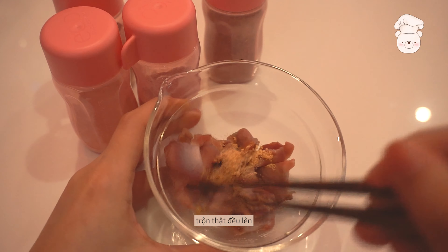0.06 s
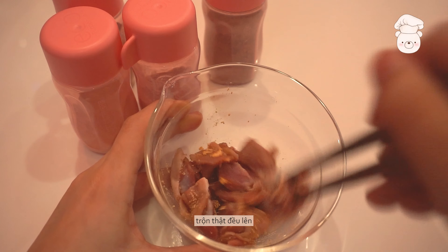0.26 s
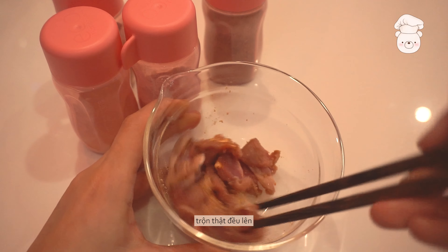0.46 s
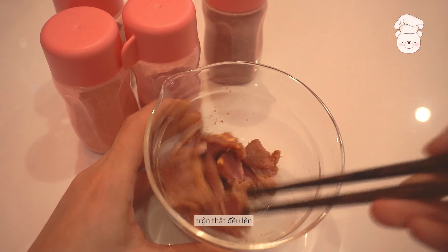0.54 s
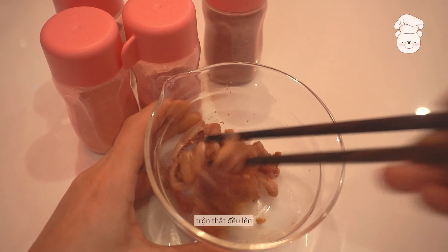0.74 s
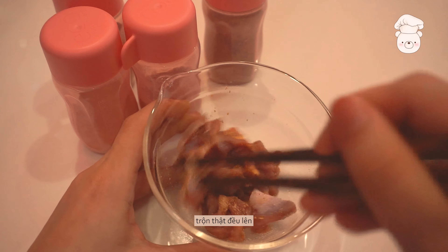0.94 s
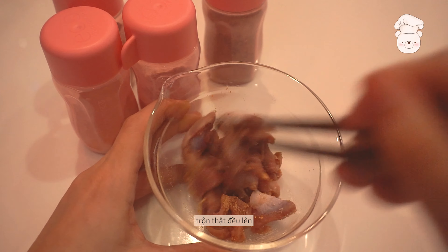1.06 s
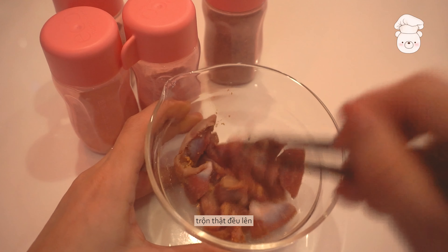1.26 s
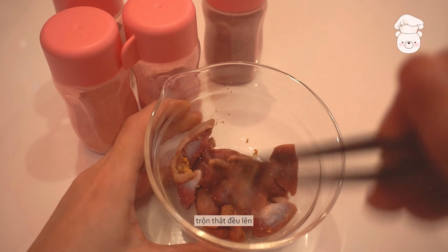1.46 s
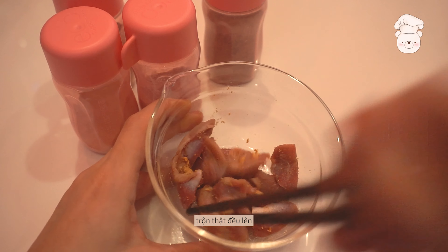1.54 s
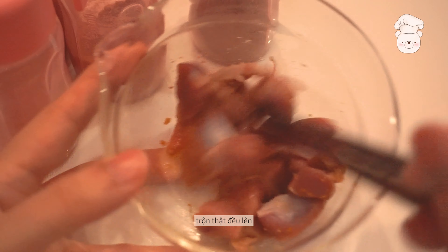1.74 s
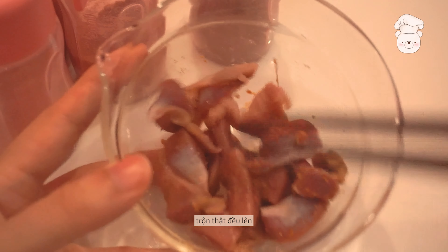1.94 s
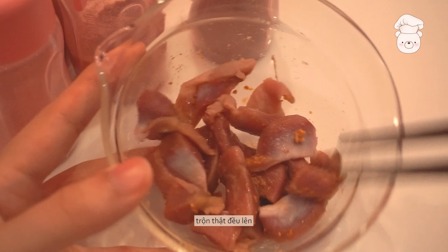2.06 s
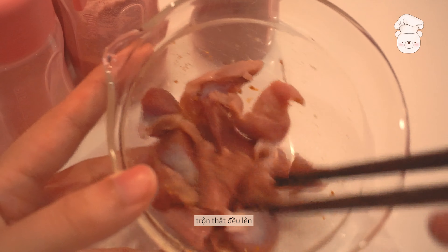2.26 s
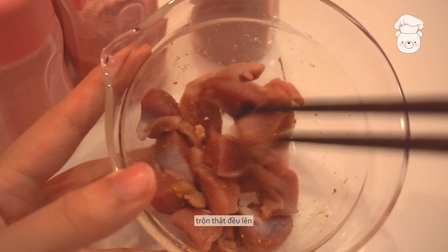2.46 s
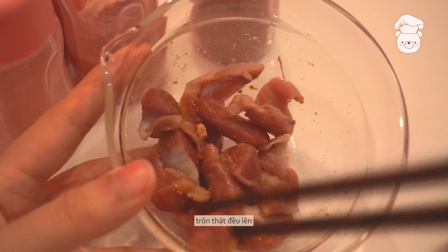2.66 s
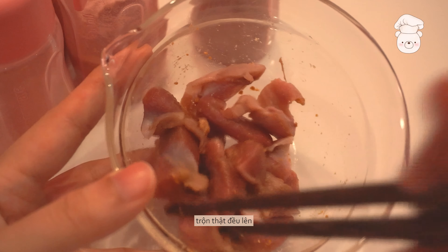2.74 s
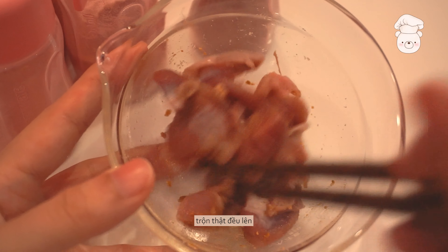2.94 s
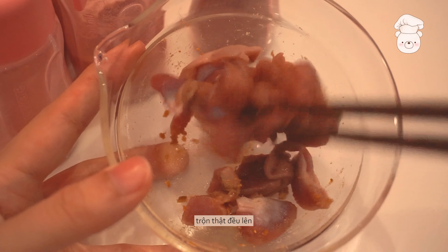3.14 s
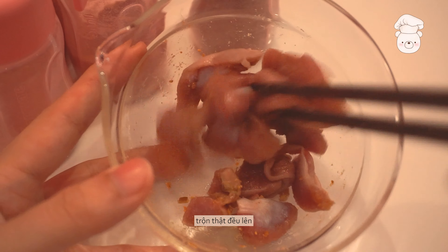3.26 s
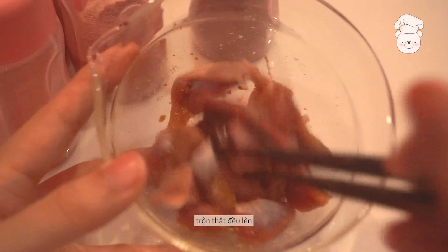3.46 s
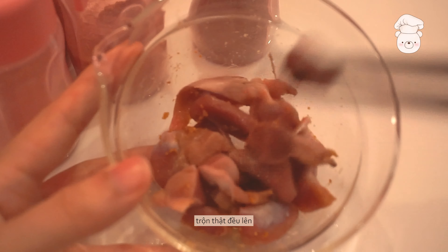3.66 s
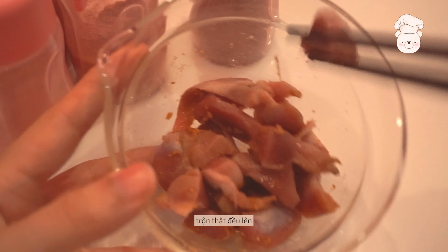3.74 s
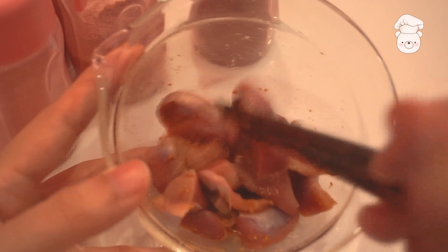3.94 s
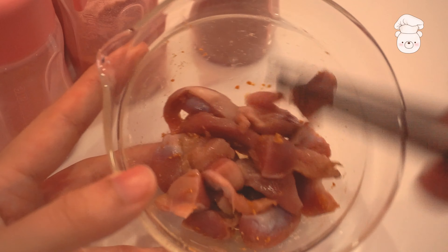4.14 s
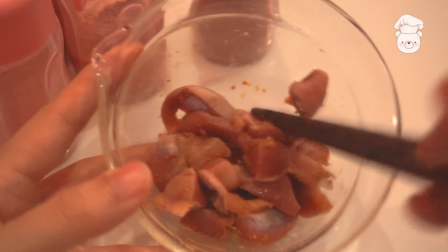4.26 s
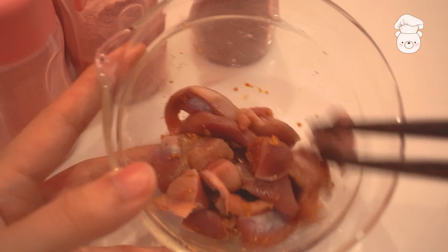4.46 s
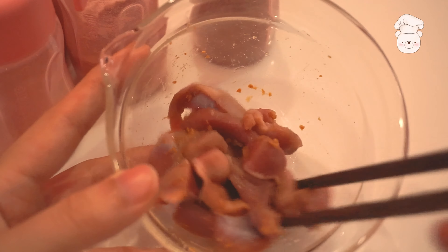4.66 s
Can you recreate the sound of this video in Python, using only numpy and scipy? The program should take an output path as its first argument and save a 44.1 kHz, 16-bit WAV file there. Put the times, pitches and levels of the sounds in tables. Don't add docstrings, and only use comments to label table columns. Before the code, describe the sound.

Wooden chopsticks stir wet meat in a glass bowl, with squelchy ticks, light glass taps and one hard clack over faint fridge hum and hiss.

```python
import sys
import numpy as np
from scipy import signal
from scipy.fft import rfft, irfft
from scipy.io import wavfile
from scipy.ndimage import uniform_filter1d

SR = 44100
rng = np.random.default_rng(int(sys.argv[2]) if len(sys.argv) > 2 else 0)


def level_to_linear(level):
    exponent = np.asarray(level, float) / 20
    return 10 ** exponent


def generate_wav(signal):
    frames = np.transpose(np.atleast_2d(signal))
    scaled = np.clip(frames, -1, 1) * 32767
    pcm = np.round(scaled).astype(np.int16)
    wavfile.write(sys.argv[1], SR, pcm)


N = 313582
TIME_S = np.arange(N) / SR

# (frequency [Hz], density [dB per Hz])
AIR_SPECTRUM = [(18, -61), (30, -24.5), (117, -20), (166, -8.5), (230, -2.5), (266, -7.5), (302, 0),
                (737, -2.5), (1210, -4.5), (1480, -8), (1940, -10), (4740, -16), (9270, -17.5), (9980, -16),
                (11300, -14), (14700, -57.5), (22000, -120)]
AIR_DB = -64.5
# (frequency [Hz], correlation [-1..1])
AIR_LIKENESS = [(60, 0.66), (130, 0.8), (270, 0.71), (580, 0.39), (1220, -0.082), (2600, -0.27),
                (5520, -0.023), (11700, -0.093)]

# (time [s], speed [Hz])
SHAFT_SPEED = [
    (0, 57.3),
    (5.5, 57.4),
    (6.3, 57.8),
    (7.11, 58.8),
]
CARRIER_HZ, BUZZ_DB = 10052.2, -77.5
# (order, left [dB], right [dB], left phase lead [rad])
WHINE_SIDEBANDS = [(-9, -87, -99, -.6), (-8, -89, -99, -.6), (-6, -88, -88, -1.2), (-5, -89, -95, -1.8),
                   (-4, -77, -85, -2.3), (-3, -82, -85, -.5), (-2, -73, -88, 2.3), (-1, -74, -81, -1.7),
                   (0, -81, -93, -.7), (1, -74, -79, -2.3), (2, -75, -95, -1.1), (3, -88, -89, -.9),
                   (4, -76, -74, -1), (6, -83, -88, 3.1), (8, -81, -94, -2.5)]
HUM_LINES_HZ = (299.5, 1194.3)
# (left [dB], right [dB])
HUM_LINES_DB = [(-78.5, -82.5), (-68.5, -86.5)]

# (frequency [Hz], t60 [s])
ROOM_DECAY = [(500, 0.33), (1500, 0.37), (3000, 0.27), (6000, 0.2), (10000, 0.11)]
ROOM_DB, ROOM_GAP_S = -6.5, 0.012
ECHO_HOLD_S = 0.3

# (time [s], level [dB], pitch [Hz], length [s])
HAND_BUMPS = [
    (.36, -76, 170, .16),
    (1.7, -88, 38, .14),
    (4.12, -90, 55, .1),
    (6.29, -88, 33, .09),
]
# (start [s], level [dB], length [s])
DRAGS = [
    (0, -78, 0.6),
    (.55, -81, 0.46),
    (2.76, -73, .09),
    (3.38, -79, .12),
    (3.8, -77, .07),
    (5.15, -82, 0.26),
    (5.9, -80, .12),
]
# (time [s], level [dB], pitch [Hz], length [s])
TIP_SQUEAKS = [
    (1.418, -65, 6400, .02),
    (1.716, -68, 6450, 0.013),
    (1.758, -68, 6400, .016),
    (1.842, -65, 6340, .012),
    (3.245, -62.5, 6350, .01),
    (4.86, -72, 6400, 0.039),
    (5.28, -74.5, 6350, .02),
    (6.165, -71, 8550, .025),
    (6.463, -72, 3600, .02),
]

# (time [s], level [dB], pitch [Hz], left minus right [dB])
WET_POPS = [(0.0575, -55, 5600, 5), (.1182, -43, 6900, 5), (.1362, -55, 6300, 1.5), (.1954, -57, 8330, 3.5),
            (.2012, -51, 7070, 2.5), (.2638, -54, 9250, 5), (.893, -53, 9070, 4), (1.2024, -45, 5500, 11),
            (1.4109, -50, 7260, 10), (1.846, -49, 8500, 5), (1.859, -48, 8700, 1.5), (1.871, -50, 8860, 6),
            (2.0954, -45, 4350, -16), (2.1795, -56, 7900, 1.5), (2.2797, -51, 9150, 5),
            (2.3915, -55, 9120, 1.5), (2.7614, -51, 9180, 6), (2.832, -46, 9250, 0),
            (2.9587, -40.5, 7210, 3), (2.9748, -41, 9190, 7.5), (2.9828, -53, 6600, 11),
            (4.1514, -57, 8800, 2.5), (3.966, -47, 9180, 1.5), (4.2043, -58, 6600, -3),
            (4.639, -63, 5300, -16), (4.739, -47, 4600, -14), (4.7845, -54, 4550, 6),
            (4.842, -47, 8540, 2.5), (5.0285, -53.5, 7200, 11), (5.0965, -50, 7860, 1.5)]
# (time [s], level [dB])
FILM_SNAPS = [(.1124, -61), (.1182, -54), (.1362, -56), (.1954, -53), (.2638, -52), (0.744, -51),
              (.9024, -58), (1.202, -45), (1.4109, -52), (1.4692, -52), (1.611, -56), (1.846, -48),
              (1.859, -46), (2.115, -54), (2.2797, -47), (2.9748, -46.5), (2.825, -60), (3.2086, -59),
              (3.966, -51), (4.2305, -55), (4.639, -55), (4.7394, -49), (4.7848, -50.5), (4.842, -49),
              (4.9197, -55), (5.1457, -54), (5.525, -48.5), (5.5459, -53), (6.3314, -54.5)]
SNAP_T60_S, SNAP_PAN_DB = 0.003, 4.5
# (peak time [s], level [dB], finest against larger bubbles [dB], swell [s], fade [s])
JUICE_SQUEEZES = [(.116, -58, -30, .016, 0.072), (.194, -77, 4, .012, .12), (.894, -74.5, 2, .016, .056),
                  (1.202, -55, -6.5, .012, 0.04), (1.25, -63, -14, .04, 0.2),
                  (1.408, -62.5, -8, .008, 0.098), (1.858, -70.5, 6, 0.077, .046),
                  (2.1, -62.5, -1, .016, 0.051), (2.265, -66, -2.5, .04, 0.17), (2.846, -69, -9, .045, .09),
                  (2.965, -56, -8, 0.019, 0.077), (3.97, -73, -1, .02, 0.07),
                  (4.736, -50.5, -12, 0.017, .07), (4.8, -65.5, -10, .06, 0.33),
                  (5.03, -74, -2.5, 0.028, .13), (5.524, -85, 17.5, .03, .075), (6.35, -86, 14, .055, .04)]

# (time [s], loaded lowest mode [Hz], its level [dB], even modes [dB], third mode [dB])
GLASS_BLOWS = [
    (1.203, 893, -56, -43.5, -47.5),
    (2.093, 878, -55.5, -66, -46.5),
    (2.757, 836, -73, -85, -68),
    (3.795, 832, -59.5, -62, -66),
    (4.741, 839, -46, -53, -53),
    (5.284, 900, -58, -72, -90),
    (5.321, 832, -56, -63, -66),
    (6.003, 870, -59.5, -74, -66.5),
    (6.044, 812, -59.5, -76, -67),
]
# (frequency [Hz], t60 [s], left minus right [dB], twin apart [Hz], towards walls [dB])
BOWL_MODES = [
    (855, 0.11, 3, -22, -0.5),
    (2123, 0.055, -2, 38, -2),
    (3870, 0.071, -6, 42, -8),
    (5953, 0.045, 7, 27, 4),
]
FOURTH_DB, HARD_DB, FOURTH_SLOPE = 2, -44, 0.8

# (time [s], low bends [dB], middle bends [dB], upper bends [dB], crack [dB])
STICK_BLOWS = [
    (1.6095, -66, -61.5, -63.5, -68),
    (1.6364, -75, -68, -73, -63),
    (2.7577, -53, -57, -67, -53),
    (3.4069, -64.5, -64.5, -77, -67),
    (4.205, -61.5, -64.5, -73, -66),
    (4.7388, -18.5, -19, -19.5, -30),
    (5.3206, -56, -46.5, -49.5, -58.5),
    (5.6301, -57.5, -48, -51, -58),
    (6.0051, -63, -55.5, -52, -60),
    (6.0443, -54.5, -47.5, -46, -60),
]
# (frequency [Hz], towards phone [dB], t60 [s], towards walls [dB])
STICK_BENDS = [
    [(1338, 2, .03, 1.1), (1114, -24.5, 0.0063, -1.5)],
    [(1565, 0.5, 0.016, 4), (1703, 4.5, .018, -1.5), (1837, 1.5, 0.016, -2.5)],
    [(2698, 3.5, 0.012, -2.5), (2868, 2.5, .008, 0.5)],
    [(3470, -5.5, 0.0044, 3), (3650, -5, .006, -1.5), (4310, 4.5, 0.0061, -4)],
]
# (time [s], level [dB], centre [Hz], t60
# [s], left minus right [dB])
TIP_HITS = [(.1362, -44.5, 3400, 0.0045, 1.5), (1.203, -29, 2830, 0.0067, 6),
            (1.2025, -33, 4500, 0.0067, .6), (1.2025, -35.5, 1330, .004, 7),
            (2.0948, -28.5, 3080, 0.0044, -12), (2.0945, -34, 4360, 0.0047, 3),
            (2.0965, -36, 1360, 0.0052, 6), (2.9585, -43, 4130, 0.0054, 1.5),
            (3.7951, -35.5, 2700, 0.005, 1.2), (3.7948, -31, 4300, 0.003, 9),
            (3.7935, -46, 1240, 0.011, 1.2), (4.739, -32, 1310, .006, -2), (4.73996, -24, 3250, .003, 1.5),
            (5.325, -52, 2600, .04, 1.5), (5.634, -56, 2700, .04, 1.5), (6.048, -54, 1560, .05, 1.5),
            (4.8, -44, 5200, .004, 1.5), (4.3, -51, 1050, 0.0073, 1.5)]
DIP_HZ, DIP_Q, TIP_WALL_DB = 2200, 3.5, -1.5

SMEAR_DB, SMEAR_S, TOP_HZ = -29, 0.015, 11020


def on_log_hz(hz, table):
    table_hz, value = np.transpose(table)
    return np.interp(np.log(hz + 1), np.log(table_hz), value)


def sides(pan_db):
    return level_to_linear(np.array([pan_db, -np.asarray(pan_db)]) / 2)


def walk(rate_hz):
    k = int(SR / rate_hz)
    steps = np.repeat(rng.standard_normal(N // k + 1), k)
    return 1.45 * uniform_filter1d(uniform_filter1d(steps, k), k)[:N]


def band(x, lo_hz, hi_hz):
    return signal.sosfilt(signal.butter(2, [lo_hz, hi_hz], "band", fs=SR, output="sos"), x)


def high_pass(x, hz):
    return signal.sosfilt(signal.butter(3, hz, "high", fs=SR, output="sos"), x)


def ring(start_s, db, pan_db, hz, t60_s, push_s):
    out = np.zeros((2, N + SR))
    events = np.broadcast_arrays(start_s, db, pan_db, hz, t60_s)
    for one_s, one_db, one_pan_db, one_hz, one_t60_s in zip(*events):
        t = np.arange(int(one_t60_s * SR) + 8) / SR
        rise = np.sin(np.pi / 2 * np.minimum(t / push_s, 1)) ** 2
        decay = level_to_linear(one_db - 60 * t / one_t60_s)
        tone = decay * rise * np.sin(2 * np.pi * one_hz * t)
        i = int(one_s * SR)
        out[:, i:i + len(t)] += sides(one_pan_db)[:, None] * tone
    return out[:, :N]


def slips(table, waver_hz, depth):
    out, waver = np.zeros(N), walk(waver_hz)
    for s, db, hz, length_s in table:
        i = int(s * SR) + np.arange(int(length_s * SR))
        phase = 2 * np.pi * np.cumsum(hz * (1 + depth * waver[i])) / SR
        out[i] += level_to_linear(db) * np.hanning(len(i)) * np.sin(phase)
    return out


def air():
    hz = np.arange(N // 2 + 1) * SR / N
    like = np.clip(on_log_hz(hz, AIR_LIKENESS), -1, 1)
    noise = rfft(rng.standard_normal((2, N))) * level_to_linear(on_log_hz(hz, AIR_SPECTRUM))
    mid, side = noise * np.sqrt([1 + like, 1 - like])
    rush = irfft([mid + side, mid - side], N)
    return rush / rush.std() * level_to_linear(AIR_DB + 0.5 * walk(0.89)) * sides(1.2)[:, None]


def fridge():
    shaft = 2 * np.pi * np.cumsum(np.interp(TIME_S, *np.transpose(SHAFT_SPEED))) / SR
    carrier = 2 * np.pi * CARRIER_HZ * TIME_S
    lines = [(carrier + order * shaft, db, lead) for order, *db, lead in WHINE_SIDEBANDS]
    lines += [(2 * np.pi * hz * TIME_S, db, 0) for hz, db in zip(HUM_LINES_HZ, HUM_LINES_DB)]
    buzz = band(rng.standard_normal((2, N)), 9750, 10350)
    out = level_to_linear(BUZZ_DB) * sides(4.5)[:, None] * buzz / buzz.std()
    for phase, db, lead in lines:
        start = 2 * np.pi * rng.random() + np.array([[lead], [0]])
        level = np.sqrt(2) * level_to_linear(np.array(db)[:, None] - 1.2 + 2.5 * walk(4))
        out = out + level * np.sin(phase + start + 0.4 * walk(5))
    return out


def kitchen(x):
    t, hold = np.arange(SR // 2) / SR, int(ECHO_HOLD_S * SR)
    places = np.pad(x.mean(axis=0), (0, -N % hold)).reshape(-1, 1, hold)
    noise = rng.standard_normal((4, 2, len(t)))
    tail = 0
    for hz in 250 * 2 ** np.arange(0, 6, 0.5):
        decay = np.exp(-np.log(1000) * t / on_log_hz(hz, ROOM_DECAY))
        tail = tail + band(noise, hz, hz * np.sqrt(2)) * decay
    tail = tail * np.clip(t / ROOM_GAP_S - 0.4, 0, 1)
    tail = tail / np.sqrt((tail ** 2).sum(axis=(1, 2), keepdims=True) / 2)
    out = np.zeros((2, N + SR))
    for k, part in enumerate(places):
        echo = signal.fftconvolve(part, tail[k % 4], axes=1)
        out[:, k * hold:(k + 1) * hold + len(t) - 1] += echo
    return level_to_linear(ROOM_DB) * out[:, :N]


def bumps():
    return slips(HAND_BUMPS, 29.8, 0.04)


def rubs():
    grains = rng.standard_normal((2, N)) * level_to_linear(3.0 * rng.exponential(size=N))
    drag = band(grains, 1250, 2500)
    stroke = 0
    for s, db, length_s in DRAGS:
        stroke = stroke + level_to_linear(db) * np.sin(np.pi * np.clip((TIME_S - s) / length_s, 0, 1))
    return stroke * level_to_linear(2.8 * walk(25)) * drag / drag.std()


def squeaks():
    return slips(TIP_SQUEAKS, 300, 0.012) * sides(2.2)[:, None]


def pops():
    s, db, hz, pan_db = np.transpose(WET_POPS)
    return ring(s + 0.0003, db + 11.0, pan_db, hz, 15 / hz, push_s=0.00037)


def snaps():
    s, db = np.transpose(FILM_SNAPS)
    hz = 10300 * (1 + 0.02 * rng.standard_normal(len(s)))
    ticks = ring(s + 0.0003, db + 14.5, SNAP_PAN_DB, hz, SNAP_T60_S, push_s=0.0005)
    return band(ticks, 9300, 12500)


def fizz():
    grains = rng.standard_normal((2, N)) * level_to_linear(3.3 * rng.exponential(size=N))
    fine_level, large_level = np.zeros(N), np.zeros(N)
    for s, db, fine_db, swell_s, fade_s in JUICE_SQUEEZES:
        squeeze = np.interp(TIME_S, [s - swell_s, s, s + fade_s], [0, 1, 0])
        fine_level += level_to_linear(db + fine_db) * squeeze
        large_level += level_to_linear(db) * squeeze
    fine, large = band(grains, 9500, 11200), band(grains, 5000, 9300)
    hiss = 2.1 * fine_level * fine / fine.std() + 0.5 * large_level * large / large.std()
    return sides(2.67)[:, None] * hiss


def bowl():
    s, low_hz, low_db, even_db, third_db = np.transpose(GLASS_BLOWS)
    fourth_db = even_db + FOURTH_DB + FOURTH_SLOPE * (even_db - HARD_DB)
    twin_db = -5 + 2.0 * rng.standard_normal((4, len(s)))
    out = 0
    for k, db in enumerate([low_db, even_db, third_db, fourth_db]):
        hz, t60_s, pan_db, apart_hz, wall_db = BOWL_MODES[k]
        hz = hz if k else low_hz
        pair = ring(s, db + 4.0, pan_db, hz, t60_s, push_s=0.0037)
        pair = pair + ring(s, db + twin_db[k], -pan_db, hz + apart_hz, t60_s, push_s=0.003)
        out = out + np.array([pair, level_to_linear(wall_db) * pair])
    return out


def sticks():
    s, *group_db = np.transpose(STICK_BLOWS)
    modes = [(db, *mode) for db, group in zip(group_db, STICK_BENDS) for mode in group]
    near = far = 0
    for db, hz, near_db, t60_s, far_db in modes:
        hz = hz * (1 + 0.004 * rng.standard_normal(len(s)))
        pan_db = 0.7 + 2.5 * rng.standard_normal(len(s))
        near = near + ring(s + 0.00033, db + near_db + 9.0, pan_db, hz, t60_s, push_s=0.0018)
        far = far + ring(s, db + far_db + 8.5, 0, hz, t60_s, push_s=0.0014)
    bends = signal.lfilter(*signal.iirnotch(DIP_HZ, DIP_Q, fs=SR), [near, far])
    tip_s, tip_db, tip_hz, tip_t60_s, tip_pan_db = np.transpose(TIP_HITS)
    tips = ring(tip_s, tip_db, tip_pan_db, tip_hz, tip_t60_s, push_s=0.00062)
    return high_pass(bends + [tips, level_to_linear(TIP_WALL_DB) * tips], 930)


def scene():
    wet = pops() + snaps() + fizz() + squeaks()
    near, far = sticks() + bowl() + wet
    return air() + fridge() + kitchen(far) + bumps() + rubs() + near


def band_limit(x):
    return signal.sosfilt(signal.butter(12, 12340, fs=SR, output="sos"), x)


def record(dry):
    count = int(SMEAR_S * SR)
    swell = np.linspace(0, 1, count) * level_to_linear(SMEAR_DB) / np.sqrt(count / 3)
    ahead = rng.standard_normal((2, count)) * swell
    smeared = dry + signal.fftconvolve(dry, ahead, axes=1)[:, -N:]
    cut = signal.sosfilt(signal.ellip(10, 0.3, 36, TOP_HZ, fs=SR, output="sos"), smeared)
    return band_limit(cut)


dry = scene()
out = record(dry)
generate_wav(out)
```